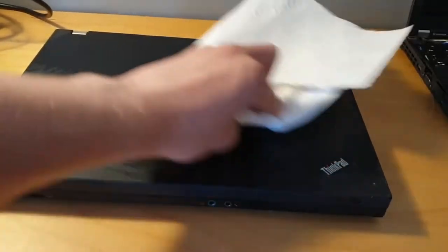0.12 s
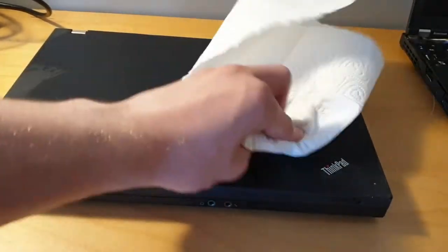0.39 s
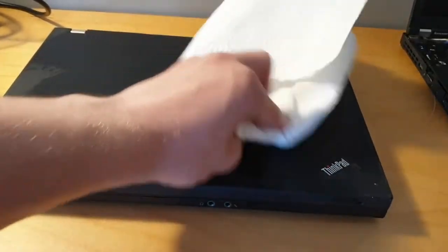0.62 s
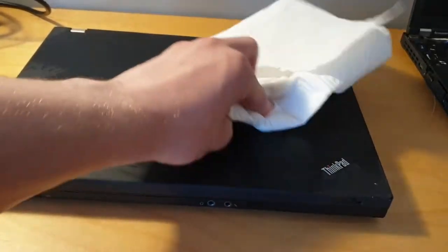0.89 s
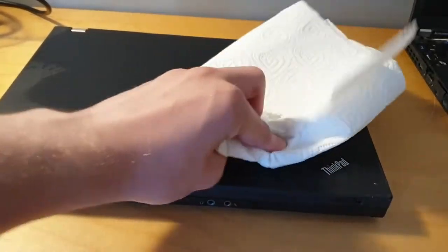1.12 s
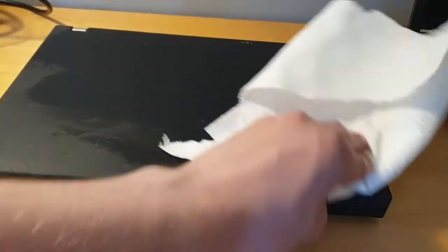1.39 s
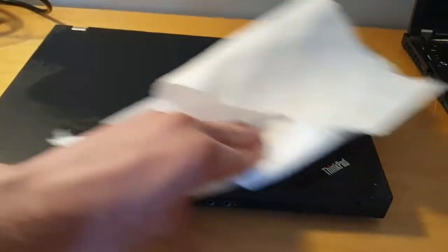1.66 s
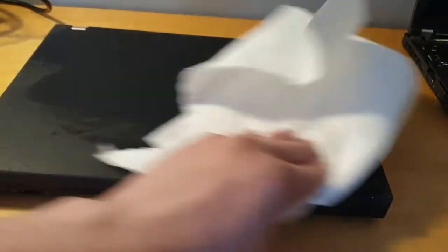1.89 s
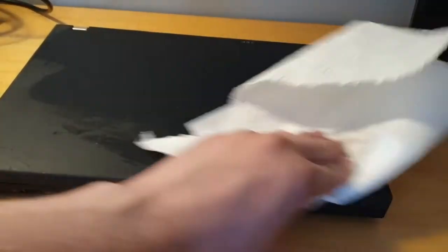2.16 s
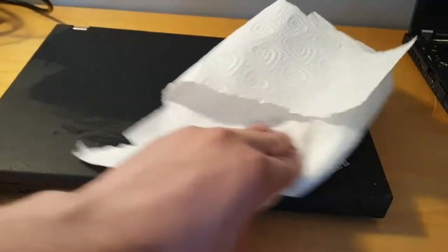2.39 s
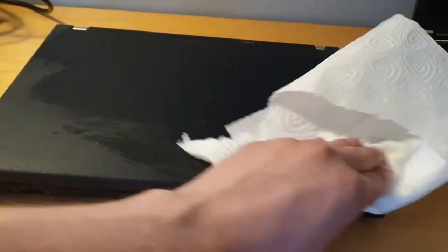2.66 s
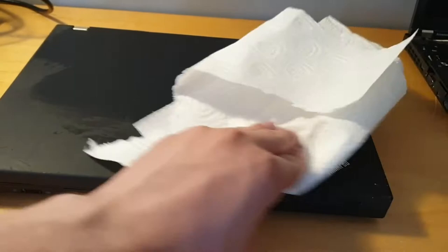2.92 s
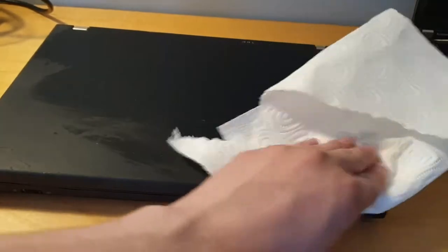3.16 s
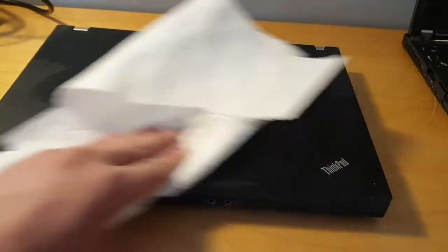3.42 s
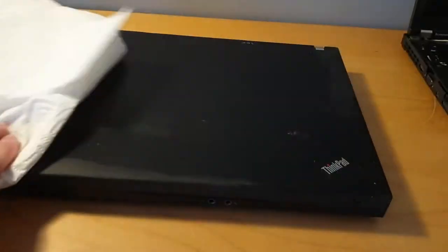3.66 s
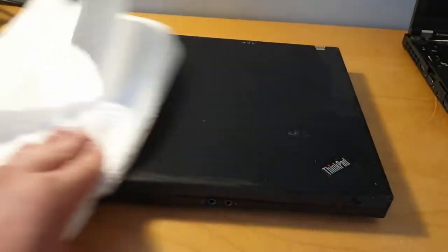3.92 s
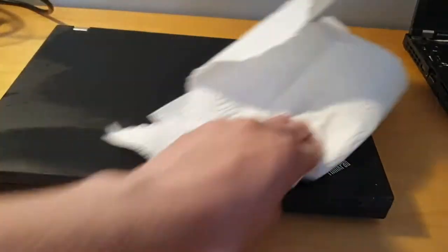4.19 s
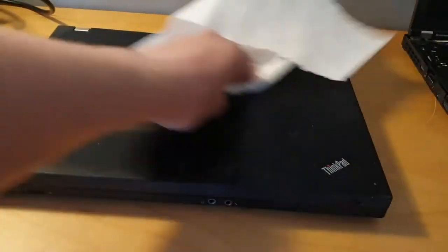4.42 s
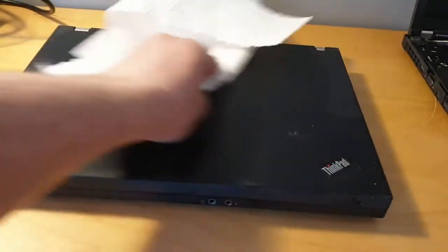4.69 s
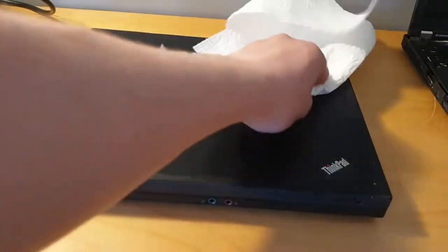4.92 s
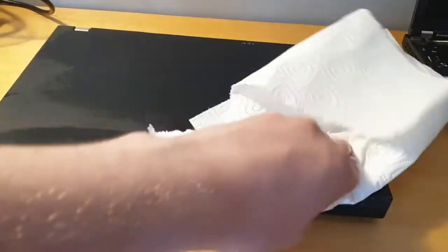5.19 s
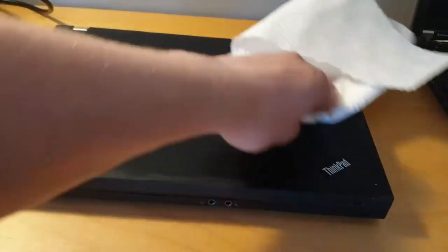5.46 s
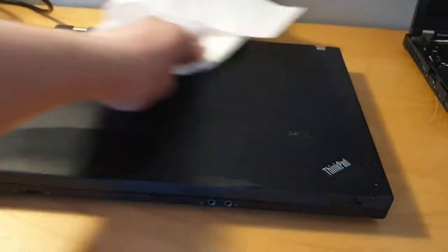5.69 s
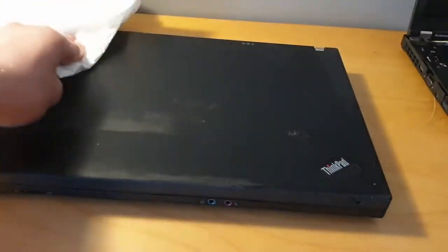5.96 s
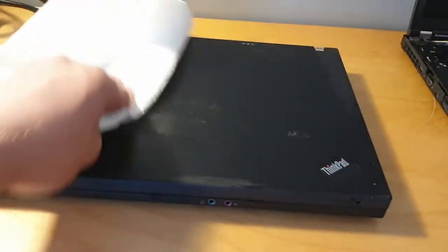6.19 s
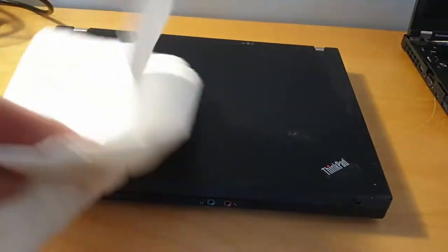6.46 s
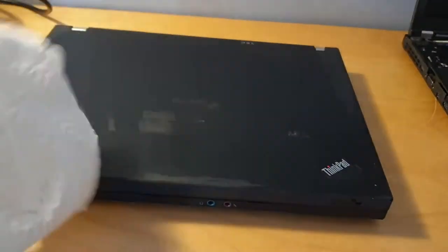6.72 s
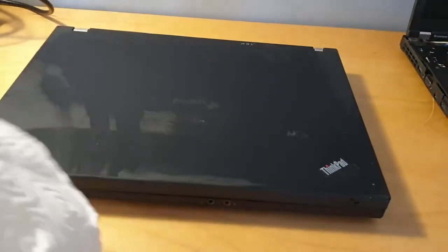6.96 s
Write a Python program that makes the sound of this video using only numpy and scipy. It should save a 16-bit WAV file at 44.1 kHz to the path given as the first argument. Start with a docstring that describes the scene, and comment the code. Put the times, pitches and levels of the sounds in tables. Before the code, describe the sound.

Brisk papery wiping strokes on a hollow plastic case, low desk rumbles and light ticking beneath, hardest bumps late, ending on a short hiss.

```python
"""A paper towel wipes the plastic lid of a laptop on a wooden desk, close to a phone held in the hand.
It opens on quick hissing strokes over quiet room air, while the case judders and ticks under the hand.
A knock and a crackle near 1.2 s lead to longer strokes; the hardest bumps come near 5.4 s, lesser ones
after 6 s, and the lifted sheet ends on one short hiss. The hiss is noise that follows the speed of the
hand; desk and case are ringing modes, pushed by the drag and by blows; ticks are short tones near 1 kHz."""
import sys
import numpy as np
from scipy import signal
from scipy.fft import rfft, irfft, next_fast_len
from scipy.io import wavfile
from scipy.ndimage import uniform_filter1d, map_coordinates

SR = 44100
rng = np.random.default_rng(int(sys.argv[2]) if len(sys.argv) > 2 else 0)


def generate_wav(sig):
    """Save sig (samples, or channels by samples) to the path in sys.argv[1] as 16-bit PCM at SR."""
    pcm = np.round(np.clip(np.atleast_2d(sig).T, -1, 1) * 32767).astype(np.int16)
    wavfile.write(sys.argv[1], SR, pcm)


def volts_from_db(level):
    """Convert decibel levels to linear amplitude ratios."""
    exponent = np.asarray(level, float) / 20
    return 10 ** exponent


N = 312669  # length of the scene [samples]
FAST = next_fast_len(N)
HZ = np.fft.rfftfreq(FAST, 1 / SR)
TIME = np.arange(N) / SR

# modes of the wooden desk: (frequency [Hz], level [dB], free decay by 60 dB [s])
DESK_MODES = [(50, -3.5, 0.27), (56.8, 13, 0.075), (78.6, -1.5, 0.24), (103.2, 3.5, 0.2)]
# modes of the laptop case: (frequency [Hz], level [dB], free decay by 60 dB [s])
CASE_MODES = [(181.8, 1.5, 0.11), (217.3, 3.5, 0.089), (264.7, -2.5, 0.18), (326.6, -3.5, 0.12),
              (433.4, 1, 0.047), (556, 0, 0.036), (680, -13.5, 0.12), (788, -6.5, 0.1), (940, -10.5, 0.081),
              (1083, -11.5, 0.12), (1512, -9.5, 0.084)]


def curves(table):
    """The columns of a table in time, a value for every sample."""
    s, *columns = np.vstack(table).T
    return [np.interp(TIME, s, column) for column in columns]


def across(table, hz):
    """A (frequency [Hz], value) table read on a log frequency axis."""
    f, value = np.transpose(table)
    return np.interp(np.log(np.maximum(hz, 1)), np.log(f), value)


def coloured(x, gain):
    """x with a gain for every frequency."""
    return irfft(rfft(x, FAST) * gain, FAST)[..., :N]


def unit(x):
    """x at rms 1."""
    return x / np.sqrt(np.mean(x ** 2))


def walk(rate):
    """Random levels held 1 / rate s and slewed twice; spread near 1."""
    k = int(SR / rate)
    steps = np.repeat(rng.standard_normal(N // k + 1), k)
    return 0.69 * uniform_filter1d(uniform_filter1d(steps, k), k)[:N]


def ring(x, hz, t60):
    """One mode; an impulse of 1 starts a fading sine of height 1."""
    pole = np.exp(2j * np.pi * hz / SR - np.log(1000) / (t60 * SR))
    return signal.lfilter([1], [1, -pole], x).imag


def room(level_db=-75):
    """Quiet room air and microphone hiss: coloured noise whose bass is alike at both ports."""
    # colour of the air and hiss: (frequency [Hz], relative density [dB per Hz])
    air = [(40, -4), (80, -4.5), (260, -20), (450, -24), (700, -44), (2000, -29), (5300, -19), (6800, -18),
           (8300, -32), (12000, -18), (16000, -35)]
    mid, side = rng.standard_normal((2, N))
    colour = volts_from_db(across(air, HZ))
    apart = np.clip(HZ / 1500, .15, 1)
    mid, side = coloured(mid, colour), coloured(side, colour * apart)
    return volts_from_db(level_db) * np.array([mid + side, mid - side]) / np.sqrt(np.mean(mid ** 2))


def spells(table, rise, fall):
    """Power of each level column of spells that rise, hold and die at steady rates [dB per s]."""
    out = 0
    for s, held, *db in table:
        away_db = rise * np.maximum(s - TIME, 0) + fall * np.maximum(TIME - s - held, 0)
        out = out + volts_from_db(2 * (np.array(db)[:, None] - away_db))
    return out


def shaking(uneven_per_s=14):
    """Gain of the five groups of modes: a drag that catches and slips, with leans and jolts on top."""
    # load of the steady drag: (time [s], desk [dB], case [dB])
    load = [(0, 12, 8), (.25, 3, 1.5), (.45, 1, 4), (.78, 2, -3.5), (.95, 3, 3.5), (1.15, -9.5, -3),
            (1.4, -1, -8), (1.75, -4, -0.5), (2.2, 6, 4), (2.6, 3, -1.5), (2.8, 0, 0), (3.3, -3, 0),
            (3.55, -2, -2.5), (3.8, -4, -9), (3.95, 1, 0), (4.12, -4, -13.5), (4.4, 1, 1), (4.7, -6, -0.5),
            (5.05, 8, 3.5), (5.24, -2, -8), (5.6, -1, -0.5), (6.0, -0.5, 3), (6.7, 6, -3.5), (6.95, 1, -13),
            (7.09, 2, -10)]
    # drag before its load: (deep desk, top desk, low case, middle case, upper case modes [dB])
    base_db = (-73, -81.5, -75, -75.5, -73.5)
    # the arm leans on the desk and shakes it: (time [s], held [s], deep modes [dB], top mode [dB])
    leans = [(.04, .03, -66, -65), (.39, .01, -60, -79), (.53, .085, -49, -62), (.66, .09, -52, -74),
             (.82, .085, -50, -56), (.97, .1, -50, -67), (1.54, .01, -63, -72), (1.64, .01, -69, -82),
             (1.93, .01, -63, -79), (2.12, .01, -62, -70), (2.2, .01, -64, -66), (2.32, .02, -71, -80),
             (2.74, 0.011, -57, -71), (3.02, 0.096, -51, -68.5), (3.18, .01, -53, -70),
             (3.26, .09, -52, -81), (3.39, .01, -64, -75), (3.93, .04, -66.5, -75),
             (4.33, 0.034, -56.5, -71), (5.36, 0.095, -47.5, -55), (5.5, .01, -58, -59),
             (6.19, 0.022, -68, -50.5), (6.52, 0.018, -58, -57), (6.67, .01, -63, -81)]
    # the push of the hand jolts the case:
    # (time [s], held [s], low modes [dB], middle modes [dB], upper modes [dB])
    jolts = [(.126, 0.0066, -60, -74, -61), (.514, 0.0085, -65.5, -68, -69), (.59, 0.07, -65, -68, -72),
             (.988, 0.0077, -63, -78, -69), (1.28, 0.094, -65.5, -64.5, -65), (1.49, 0.076, -68, -63, -67),
             (1.8, 0.0087, -63, -68.5, -68), (1.9, 0.0076, -68, -65.5, -77),
             (2.13, 0.029, -65.5, -80, -67.5), (2.75, 0.0086, -68, -72, -62), (2.92, .01, -69, -77, -66),
             (3.0, 0.011, -63, -73, -69), (3.26, 0.011, -63, -85, -77), (3.66, 0.0073, -67, -87, -82),
             (4.16, 0.018, -67, -71, -65), (4.32, 0.025, -58.5, -86, -85), (4.44, 0.025, -67.5, -74, -82),
             (4.69, .01, -88, -65, -64), (5.1, 0.017, -60.5, -63, -72), (5.33, 0.031, -57, -61, -59),
             (5.44, 0.035, -49.5, -61, -62), (5.71, 0.013, -69, -77, -79), (5.96, 0.042, -87, -71, -62.5),
             (6.13, 0.076, -55.5, -58.5, -70), (6.39, .055, -55, -69, -60), (6.5, 0.029, -53, -61.5, -59.5),
             (6.68, 0.082, -66.5, -77, -66), (6.87, 0.015, -70, -68.5, -90)]
    uneven_db = (6.4, 7.7, 6.6, 7.7, 1.6)  # random swing of each group
    desk_db, case_db = curves(load)
    loads_db = [desk_db, desk_db, case_db, case_db, case_db]
    drag = [volts_from_db(2 * (db + load_db + swing_db * walk(uneven_per_s)))
            for db, load_db, swing_db in zip(base_db, loads_db, uneven_db)]
    pushes = np.vstack([spells(leans, rise=398, fall=220), spells(jolts, rise=393, fall=256)])
    return np.sqrt(drag + pushes)


def judder(apart=.17, lid_apart=0.56, damping=.9, lid_damping=0.27):
    """The dragging hand feeds an uneven force into the modes of desk and case and shortens their ring."""
    sides = np.array([[1], [-1]])
    # (modes, side against mid, factor on the free decay)
    groups = [(DESK_MODES[:3], apart, damping), (DESK_MODES[3:], apart, damping),
              (CASE_MODES[:3], apart, damping), (CASE_MODES[3:7], lid_apart, damping),
              (CASE_MODES[7:], lid_apart, lid_damping)]
    out = 0
    for (modes, share, shorter), gain in zip(groups, shaking()):
        force = rng.standard_normal((2, N))
        # neighbouring modes move in opposite senses
        mid, side = sum((-1) ** k * volts_from_db(db) * ring(force, hz, shorter * t60)
                        for k, (hz, db, t60) in enumerate(modes))
        out = out + gain * (unit(mid) + share * sides * unit(side))
    return out


def blows(table, modes, scatter_db, apart):
    """Each blow is a soft press and rebound that rings every mode by a random share."""
    out = np.zeros((2, N))
    chance = rng.standard_normal((len(table), len(modes), 2))
    for (s, db, ms), luck in zip(table, chance):
        push = np.zeros(SR // 3)
        touch = max(int(ms * SR / 1000), 2)
        # soft flesh: the press and its rebound swell and fade over two contact times
        swing = (np.arange(2 * touch) + .5) / touch
        push[:2 * touch] = np.sin(2 * np.pi * swing) * np.sin(np.pi * swing / 2) ** 2
        rings = np.array([(-1) ** k * volts_from_db(g) * ring(push, hz, t60)
                          for k, (hz, g, t60) in enumerate(modes)])
        shares = volts_from_db(scatter_db * luck[:, :1]) * (1 + apart * luck[:, 1:] * [1, -1])
        sound = shares.T @ rings
        # the mean of the two ports peaks at the level in the table
        sound = volts_from_db(db) * sound / np.abs(sound.mean(axis=0)).max()
        i = int(s * SR)
        out[:, i:i + len(push)] += sound[:, :N - i]
    return out


def bumps():
    """Knocks ring the modes: short blows on the case and slow heavy pushes on the desk."""
    # bumps on the case: (time [s], peak [dB], contact [ms])
    knocks = [(.591, -53, 6.7), (.649, -46.5, 8.8), (.972, -47.5, 9.8), (1.221, -36, 1.05), (1.222, -42, 2),
              (1.2245, -41, 4.6), (1.243, -48, 3.8), (1.25, -43, 2.1), (1.335, -48, 1.15),
              (1.352, -55, 0.51), (1.46, -56, 0.63), (1.5, -50, 2.9), (1.53, -58, 2.9), (1.552, -63, 4.8),
              (4.34, -55, 7.5), (4.681, -55, 1.27), (5.333, -34, 5.9), (5.344, -32.5, 4.4),
              (5.364, -33, 3.7), (5.369, -45, 1.25), (5.381, -27, 5.2), (5.395, -40, 2), (5.404, -41, 5.5),
              (5.424, -46, 5.5), (5.97, -51, 1.15), (5.99, -49, 0.87), (6.1, -49, 3.3), (6.12, -47, 3.4),
              (6.14, -42, 4.2), (6.152, -45, 3.3), (6.163, -41, 4.3), (6.186, -58, 2.5), (6.396, -55, 4),
              (6.415, -47, 3.4), (6.42, -56, 0.77), (6.455, -58, 0.61), (6.473, -42.5, 0.59),
              (6.508, -47, 3.2), (7.045, -58.5, 7.1)]
    # heavy pushes that set the desk ringing: (time [s], peak [dB])
    thumps = [(1.211, -40.5), (1.246, -55), (1.267, -37.5), (6.506, -54)]
    heavy = [(s, db, 16) for s, db in thumps]  # 16 ms of contact
    case = blows(knocks, CASE_MODES, scatter_db=2, apart=.15)
    return case + blows(heavy, DESK_MODES, scatter_db=1.5, apart=.1)


def ticks(upper=1.48, upper_db=-15, rattle_db=-9, rise_s=0.0027, left_db=3.5):
    """A short chatter near 1 kHz that swells for a few cycles and dies; it is nearer the left port."""
    # a loose part of the lid ticks when the hand turns or presses:
    # (time [s], level of the swell [dB], frequency [Hz])
    loose_part = [(0.081, -52.5, 960), (0.187, -56, 980), (0.406, -50, 990), (1.269, -54, 910),
                  (1.48, -48, 984), (1.751, -51.5, 990), (1.872, -53, 975), (2.023, -50, 967),
                  (2.206, -59, 930), (2.377, -53.5, 940), (2.451, -49, 966), (2.683, -51.5, 960),
                  (2.914, -56, 940), (3.0, -47.5, 980), (3.11, -58.5, 940), (3.716, -59.5, 1050),
                  (4.148, -55, 945), (4.433, -54, 1040), (4.679, -61, 950), (5.098, -48, 980),
                  (5.276, -48, 976), (5.468, -50, 970), (5.658, -56, 965), (6.505, -45.5, 975)]
    out, t = np.zeros(N), np.arange(SR // 20) / SR
    swell = t / rise_s * np.exp(1 - t / rise_s)
    rattle = uniform_filter1d(rng.standard_normal((len(loose_part), len(t))), size=8) * 3
    rattle = rattle - uniform_filter1d(rattle, size=44)
    for (s, db, hz), noise in zip(loose_part, rattle):
        tone = np.sin(2 * np.pi * hz * t) + volts_from_db(upper_db) * np.sin(2 * np.pi * upper * hz * t)
        i = int(s * SR)
        out[i:i + len(t)] += volts_from_db(db) * swell * (tone + volts_from_db(rattle_db) * noise)
    return out * volts_from_db([[left_db / 2], [-left_db / 2]])


def crackles(low_hz=1200, high_hz=7000, decay_s=0.0014):
    """Creases of the sheet snap: a very short burst of band-passed noise at each port."""
    # creases that snap: (time [s], level at the start, ahead of the band-pass [dB])
    snaps = [(1.2223, -39), (2.682, -42), (2.9946, -48), (5.2777, -49), (6.4734, -45), (6.486, -39),
             (6.5068, -37), (6.7444, -44), (6.9641, -67), (6.9974, -57), (7.009, -61)]
    out, t = np.zeros((2, N)), np.arange(SR // 50) / SR
    for (s, db), noise in zip(snaps, rng.standard_normal((len(snaps), 2, len(t)))):
        i = int(s * SR)
        out[:, i:i + len(t)] += volts_from_db(db) * noise * np.exp(-t / decay_s)
    band = signal.butter(2, [low_hz, high_hz], "band", fs=SR, output="sos")
    return signal.sosfilt(band, out)


def hand(slow_down_s=0.065, speed_power=2.507, crisp_late_s=0.018, usual_db=-54):
    """Hiss level and colour of the wiping: each stroke speeds up, holds and slows down to its turn."""
    # strokes of the hand: (start [s], end [s], relative hiss [dB],
    # gain from start to end [dB], time to speed up [s])
    strokes = [(-0.113, 0.074, -30.5, 16, 0.15), (-0.004, 0.31, -48.5, 10, 0.074),
               (0.225, 0.46, -33, 13, 0.15), (0.396, 0.636, -44.0, 15, 0.088),
               (0.592, 0.79, -49, 12.0, 0.033), (0.735, 0.946, -37, 14, 0.15),
               (0.918, 1.173, -53.5, 0, 0.027), (1.199, 1.657, -54, 7.5, 0.015),
               (1.47, 1.845, -48.5, 13.5, 0.11), (1.779, 2.146, -48, -5, 0.1),
               (2.074, 2.427, -44.7, -9.5, 0.15), (2.365, 2.705, -46, -12.0, 0.14),
               (2.589, 2.954, -48, 10, 0.15), (2.911, 3.204, -45.5, -3, 0.11),
               (3.18, 3.79, -53.0, 4, 0.044), (3.823, 4.388, -52, 7, 0.024),
               (4.232, 4.737, -51, -12.0, 0.096), (4.633, 4.988, -43.5, -13.5, 0.13),
               (5, 5.326, -50.5, 6.5, 0.02), (5.31, 5.633, -52.5, 1.5, 0.019),
               (5.482, 6.05, -52.5, 4, 0.036), (5.984, 6.6, -53.5, -2.5, 0.064),
               (6.46, 6.803, -59.5, 7.5, 0.057), (6.78, 6.925, -63, -12.0, 0.032),
               (6.91, 7.065, -46, 10, 0.12)]
    # colour as the folds and the spot on the lid change, used about the median of each column:
    # (time [s], treble [dB], 1.3 kHz swish [dB], 2.3 kHz scrape [dB])
    shades = [(0.02, -3.5, -7.5, -7.5), (0.18, -0.8, -13.5, -5), (0.37, -5.5, -12.5, -9),
              (0.54, -1.5, -11.5, -6), (0.69, -1, -13, -6.5), (0.86, 0.3, -13.5, -5),
              (1.02, -1.5, -14.5, -6.5), (1.42, -0.2, -6.5, -8.5), (1.7, -0.3, -9.5, -11),
              (1.97, 1, -13, -11), (2.26, 0.5, -8.5, -9), (2.54, 1, -12, -11.5), (2.82, 2.5, -8, -6.9),
              (3.07, 0, -13, -11), (3.5, 3, -11, -9.0), (4.09, 0, -16, -9.6), (4.46, -1.9, -12.5, -5),
              (4.81, -0.2, -11, -4.5), (5.14, -0.3, -12, -8.2), (5.45, -0.5, -15, -8),
              (5.75, -1.5, -11.0, -3), (6.27, 1, -11.5, -8.5), (6.66, 0.8, -16, -5), (6.84, 9.5, -13, -9),
              (7.0, -2, -28, -15)]
    # the sheet still rustles at the turns, less once it is lifted at 6.86 s
    rustle_db = np.where(TIME < 6.86, -72, -83)
    power = volts_from_db(2 * rustle_db)
    for start, end, db, gain_db, speed_up_s in strokes:
        start_up = 1 - np.exp(-np.maximum(TIME - start, 0) / speed_up_s)
        slow_down = 1 - np.exp(-np.maximum(end - TIME, 0) / slow_down_s)
        speed = start_up * slow_down
        along = np.clip((TIME - start) / (end - start), 0, 1) - .5
        power = power + (speed ** speed_power * volts_from_db(db + gain_db * along)) ** 2
    level_db = 10 * np.log10(power)
    now_db = level_db - usual_db
    # the treble answers to the speed of a moment ago
    late_db = np.interp(TIME - crisp_late_s, TIME, level_db) - usual_db
    # dB of colour for each dB of hiss in treble, swish and scrape: slow is dull
    laws_db = 0.3 * late_db, -0.44 * now_db, -0.11 * now_db
    return level_db, *(db - np.median(db) + law for db, law in zip(curves(shades), laws_db))


def towel(grit_db=1.0, flicker_db=2.0, chatter_db=1.34, hiss_db=2.0):
    """Countless fibres slip over the plastic; each band flickers as the folds of the sheet shift."""
    # colour of the paper: (frequency [Hz], relative density [dB per Hz])
    paper = [(590, -21), (1000, -4.5), (1070, -12.5), (1250, -3), (1730, -4.5), (2050, -0.5), (2390, -2),
             (4900, 1.5), (6940, -2), (8160, -4.5), (12400, 1), (15100, -4.5), (16000, -52)]
    # how alike the paper sounds at the two ports: (frequency [Hz], share [0-1])
    common = [(400, 0.4), (1000, 0.58), (2000, 0.36), (4500, 0.16), (9000, 0.02), (16000, 0.07)]
    # where the towel is: (time [s], left minus right [dB], delay of left behind right [microseconds])
    place = [(0.0, 0.5, -3), (1.2, 0.5, 43), (2.2, 1.5, 20.5), (3.2, 1, 45), (3.75, 5, -190), (4.3, 0, 70),
             (4.65, 2, -78), (5.0, 1, 36), (5.35, 0.5, 143), (5.95, 2.5, -190), (6.4, 2.5, -86),
             (6.85, 2, -150), (7.0, 8, -300)]
    level_db, crisp_db, swish_db, scrape_db = hand()
    side_db, lag_us = curves(place)
    colour = volts_from_db(across(paper, HZ)) * (HZ > 600)
    # rms 1 between 2.8 and 7.5 kHz
    colour = colour / np.sqrt(2 * np.sum(colour[(HZ > 2800) & (HZ < 7500)] ** 2) / N)
    # row 0 reaches both ports, rows 1 and 2 come from other parts of the sheet and reach one each
    fibres = rfft(rng.standard_normal((3, N)) * volts_from_db(grit_db * walk(400)), FAST)
    alike = np.clip(across(common, HZ), 0, 1)
    fibres = fibres * colour * np.sqrt([alike, 1 - alike, 1 - alike])
    out = 0
    for octave in np.arange(9, 14.5, .5):  # band centres at 2 ** octave Hz
        band = np.clip(1 - 2 * np.abs(np.log2(HZ + 1) - octave), 0, 1)
        crisp = np.clip((octave - 12.5) / 0.37, 0, 1)
        swish = np.clip((11.1 - octave) / 0.18, 0, 1)
        scrape = np.clip(1 - abs(octave - 11.2) / 1.2, 0, 1)
        shade_db = crisp * crisp_db + swish * swish_db + scrape * scrape_db
        out = out + irfft(fibres * band, FAST)[:, :N] * volts_from_db(shade_db + flicker_db * walk(25))
    # the pad skips slightly as it is dragged
    both, left, right = out * volts_from_db(level_db + hiss_db + chatter_db * walk(35))
    lag = lag_us * SR / 10 ** 6  # in samples
    late = map_coordinates(both, [np.arange(N) - lag], order=3, mode="nearest")
    return np.array([left + late, right + both]) * volts_from_db([side_db / 2, -side_db / 2])


def scene():
    """Room, shaking desk and case, bumps, ticks, and the towel with its crackles in front."""
    return room() + judder() + bumps() + ticks() + crackles() + towel()


def roll_off(x):
    """The treble ends steeply here."""
    return signal.sosfilt(signal.butter(12, 16370, fs=SR, output="sos"), x)


def record(dry, cut_hz=47):
    """Two microphone ports of unlike colour, close to the lid, that lose the deepest bass."""
    # the two ports differ in colour: (frequency [Hz], left minus right [dB])
    ports = [(60, 3), (220, 1.5), (400, 3.5), (700, 2.5), (2000, 1.5), (4500, 1.5), (7000, 6.5), (7800, -2),
             (9000, -5.5), (10300, -1), (11500, 2.5), (12500, 1.5), (14000, -0.5), (15500, 10)]
    tilt_db = across(ports, HZ) / 2
    bass_cut = 1 / np.sqrt(1 + (cut_hz / (HZ + 1)) ** 8)
    mix = coloured(dry, bass_cut * volts_from_db([tilt_db, -tilt_db]))
    return roll_off(mix)


dry = scene()
out = record(dry)
generate_wav(out)
```